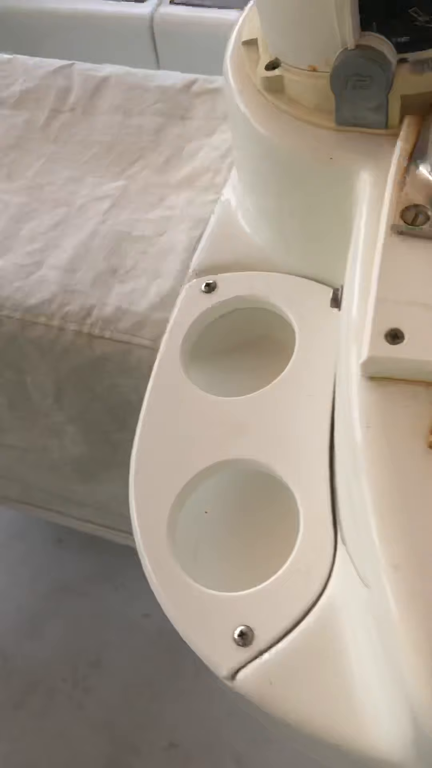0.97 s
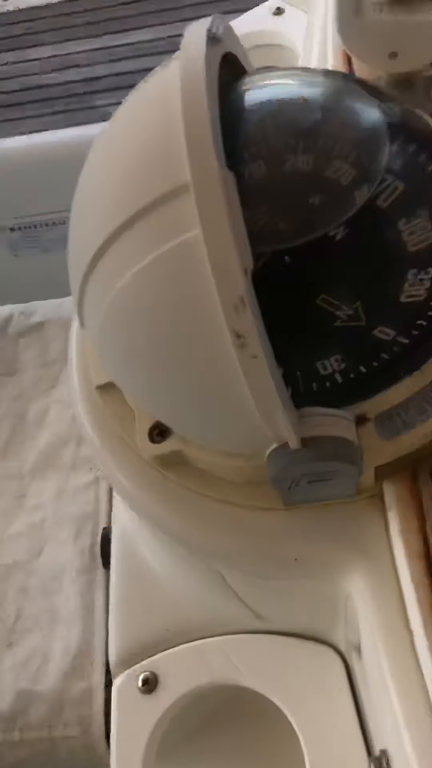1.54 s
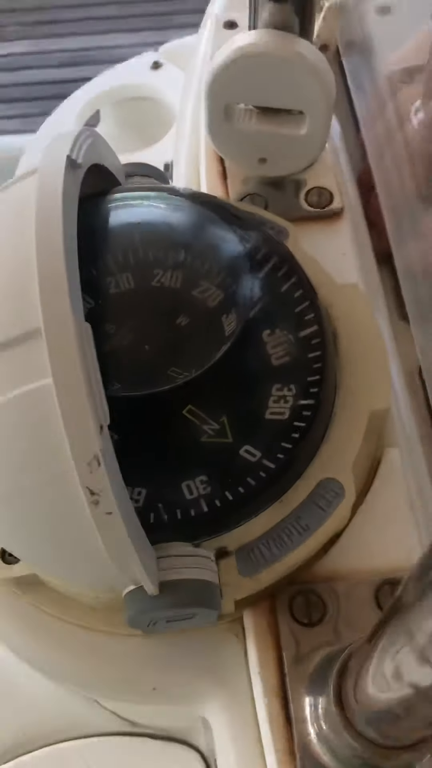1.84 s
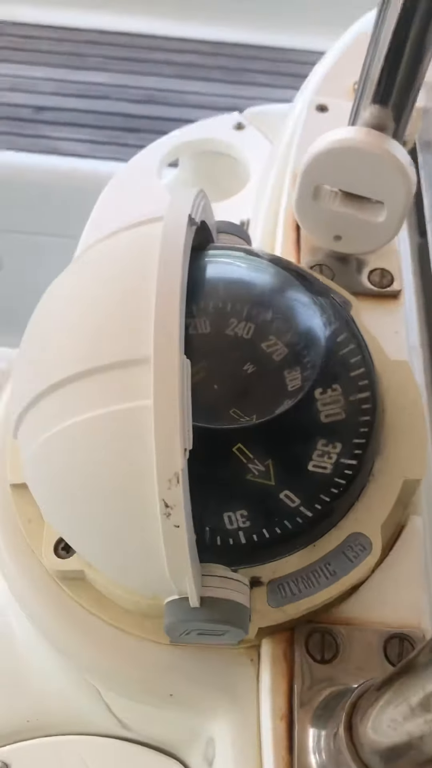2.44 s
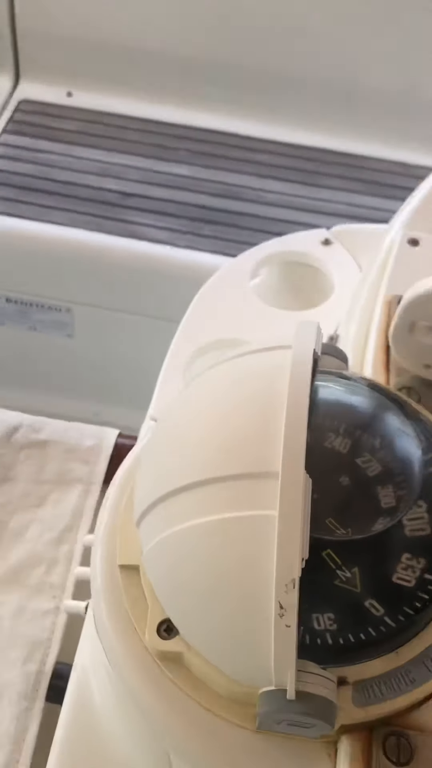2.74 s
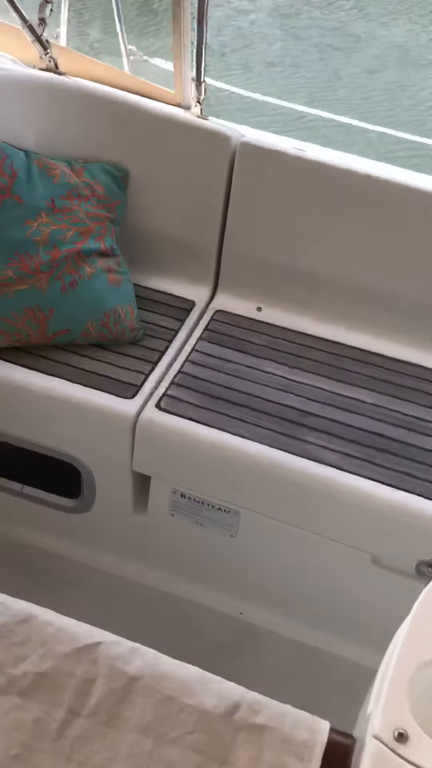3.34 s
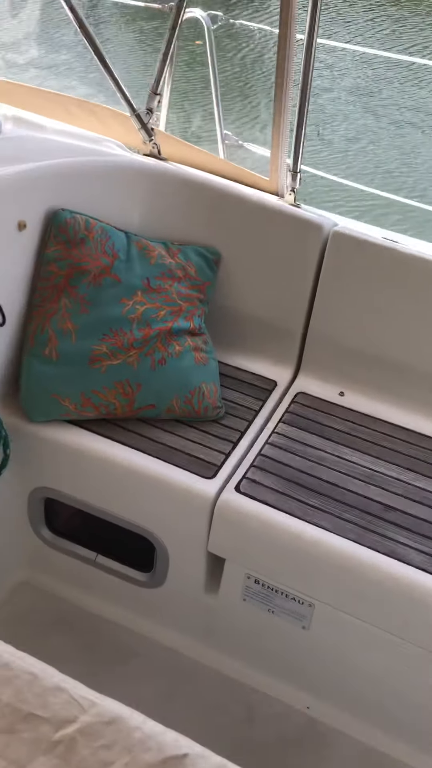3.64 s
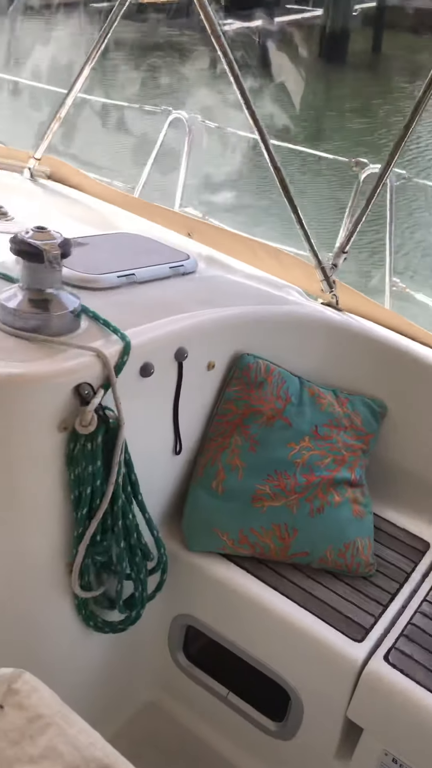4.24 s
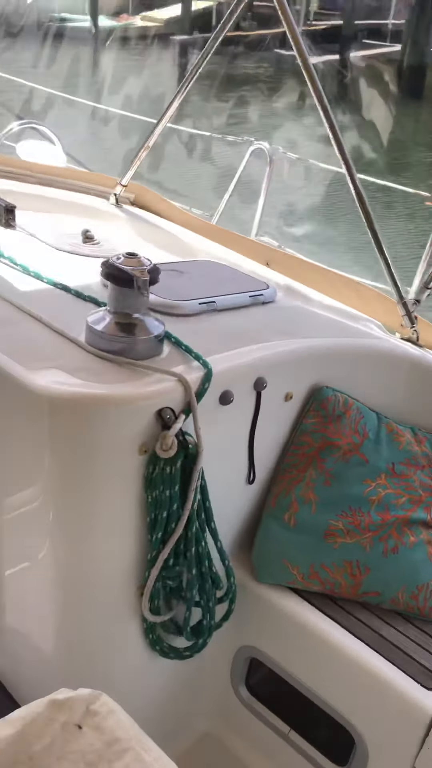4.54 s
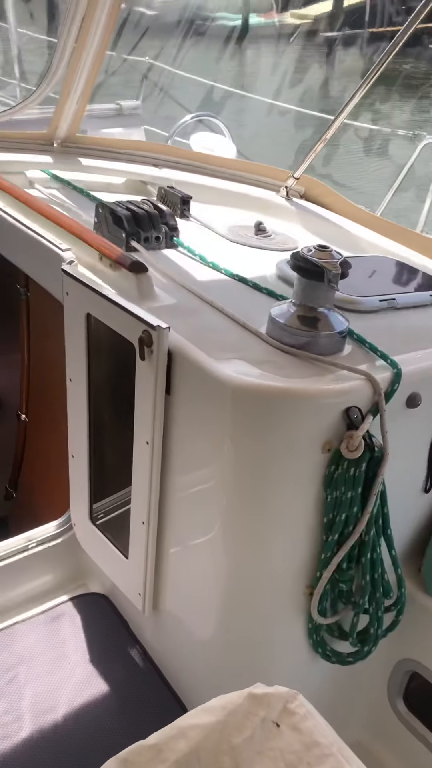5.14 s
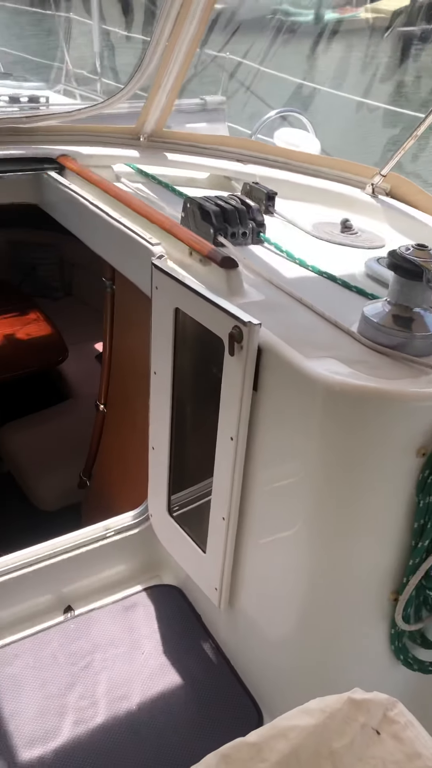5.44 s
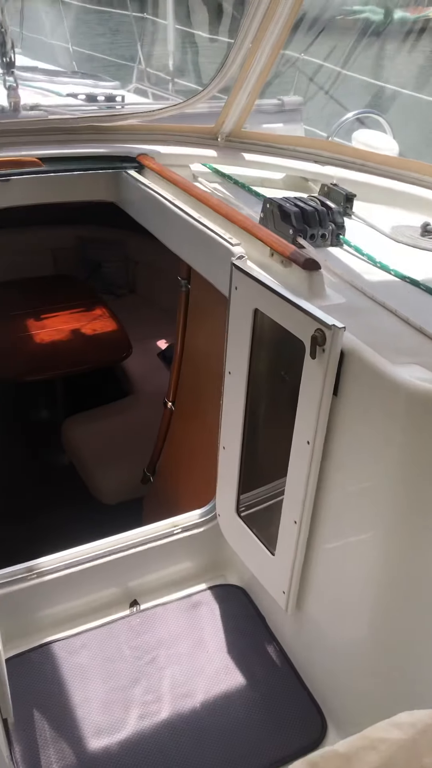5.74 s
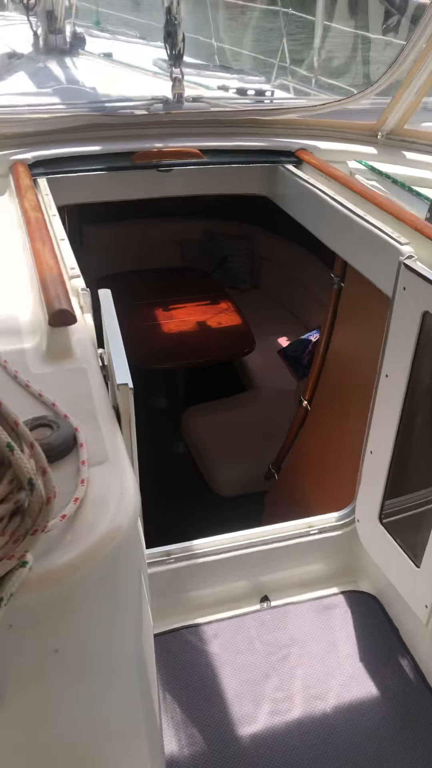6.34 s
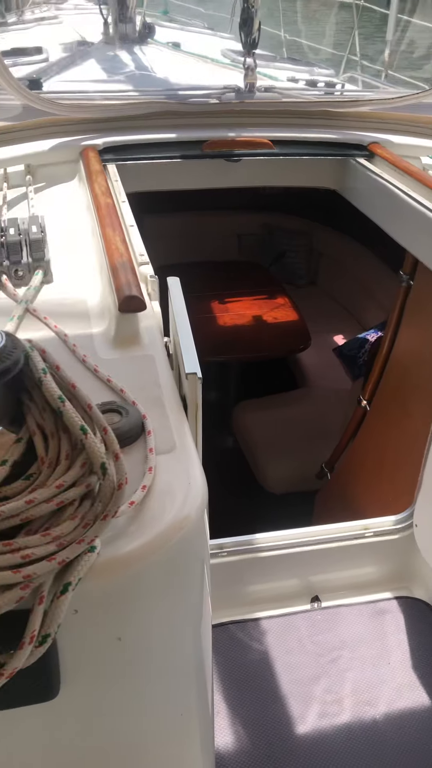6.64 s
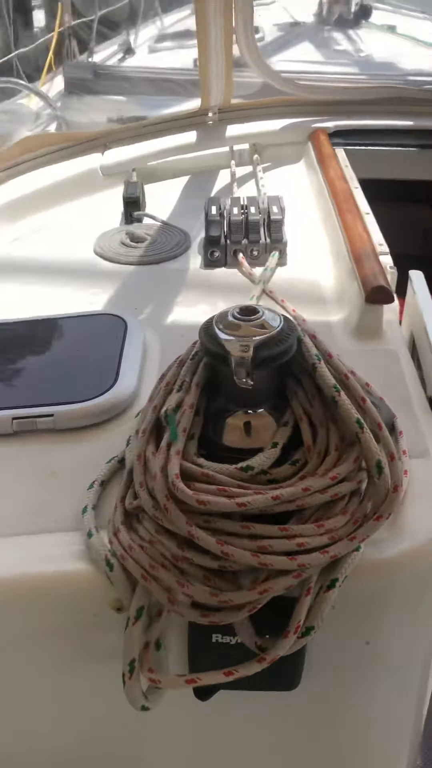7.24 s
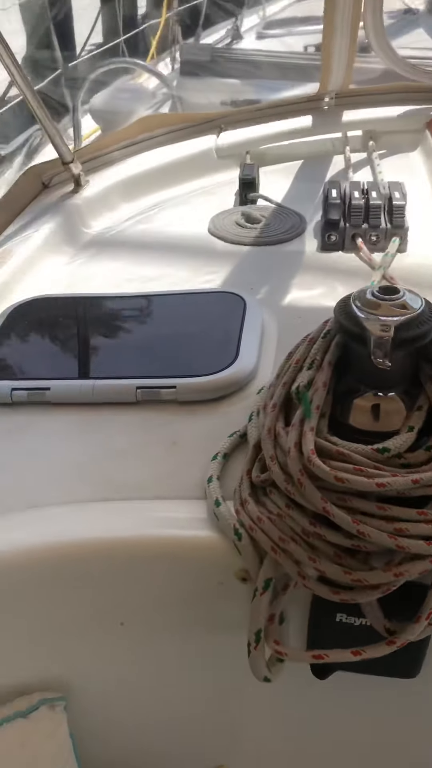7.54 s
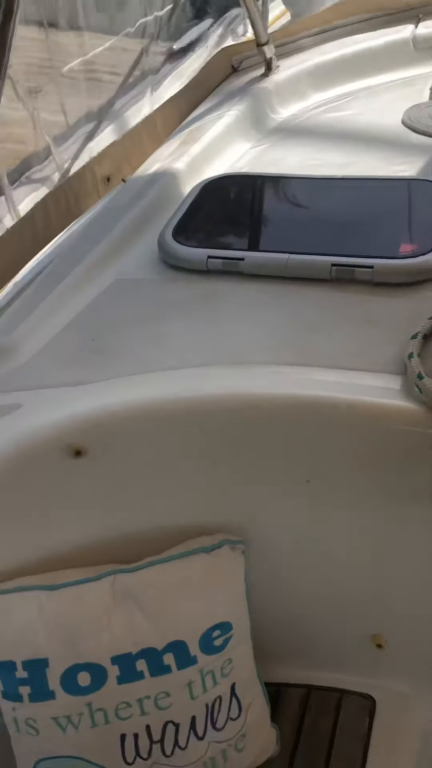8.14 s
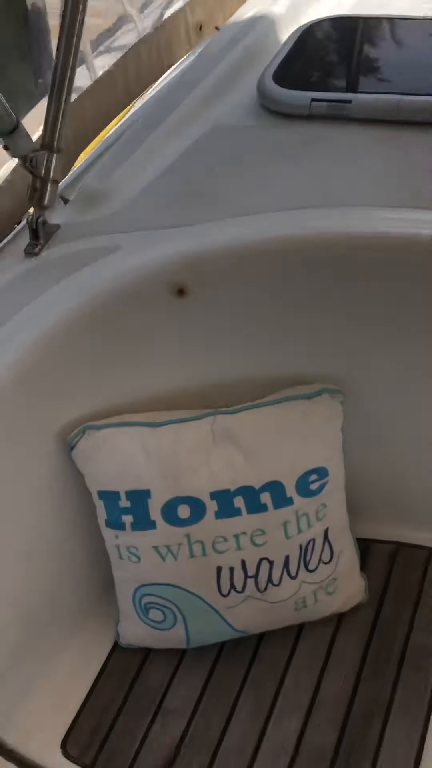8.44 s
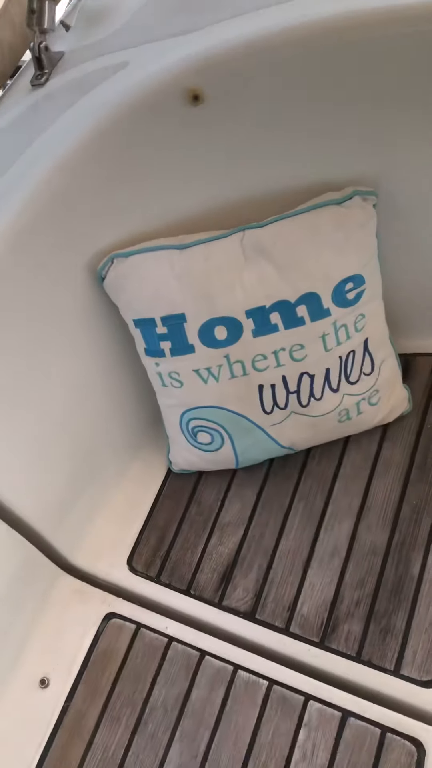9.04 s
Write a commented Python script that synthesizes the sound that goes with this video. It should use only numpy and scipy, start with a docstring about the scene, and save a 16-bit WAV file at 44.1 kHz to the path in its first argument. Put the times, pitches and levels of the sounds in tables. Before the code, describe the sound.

A dry, close rap on a lid opens at 0.1 seconds. A fitting gives a small squeaky scrape near 0.9 seconds, and light plastic taps, clicks and a step follow from 1.2 to 1.8. After a soft shoe scuff and sleeve swish, hollow fibreglass panels knock in a quick, uneven cluster from 2.7 to 3.2 seconds, ending with a bright click. Footsteps thump irregularly on the boat's floor from about 3.7 to 5.1, with a couple of knocks and low hull thuds. A thin, faint hiss swells far off around 5.6. At 6.4 seconds a hatch bangs shut, the loudest sound, making the hull boom, followed by a step and scuffs. Small metal clicks and faint taps are scattered from 7.7 to 9.1. The blows echo very briefly in the cockpit, while clothes rustle softly over a quiet harbour rumble throughout.

```python
"""First comes a dry rap on a lid, as someone moves about the fibreglass cockpit of a moored sailing boat.
Hollow panels knock, feet thump on the floor, fittings tap, squeak and click, and a hatch bangs shut.
Each blow is a burst of tiny contacts that makes a part ring and echoes between the cockpit walls;
heavy ones also make the hull boom. Clothes and shoes rub over a quiet harbour rumble and a far hiss."""
import sys
import numpy as np
from scipy import signal
from scipy.fft import rfft, irfft
from scipy.io import wavfile
from scipy.ndimage import uniform_filter1d

SR = 44100
rng = np.random.default_rng(int(sys.argv[2]) if len(sys.argv) > 2 else 0)


def bounce(signal):
    """Save signal as a 16-bit WAV file at the path given by the first command-line argument."""
    frames = np.transpose(np.atleast_2d(signal))
    limited = np.clip(frames, -1, 1)
    pcm = np.round(limited * 32767).astype(np.int16)
    wavfile.write(sys.argv[1], SR, pcm)


N = 410130
SIZE = 32768  # samples in one blow
LARGE_CROWD_HZ, SMALL_CROWD_HZ = 4000, 14000  # ringing tones of large and small parts merge above this

# Knocks on panels: t/s, level/dB, firmness/dB, contact/ms, pitch of the spot/Hz, echo/dB
KNOCKS = [(1.788, -30, 3, 7.9, 270, -7), (2.7175, -25.5, 3, 6, 410, -11.5),
          (2.786, -23.5, 3.5, 1.4, 474, -7.5), (2.8877, -20, -4.5, 0.9, 2500, -18),
          (2.8895, -21.5, -7, 2.6, 520, -4.5), (2.9262, -29, -12, 0.61, 980, -6),
          (3.1387, -18.5, -1.5, 2.8, 1130, -6), (3.176, -28.5, -6, 1.7, 1500, -4),
          (3.2135, -21, -4.5, 10, 2190, -8), (3.9808, -33.5, -11, 1.8, 1090, -3),
          (4.7152, -29.5, -3, 3.2, 2000, -4.5)]
# A panel's colour, or how strong it is from low to high: f/Hz, level/dB
PANEL_COLOUR = [(40, -35.5), (130, 2.5), (280, -1.5), (500, -5.5), (1000, -10), (1700, -5.5), (2400, -10),
                (4000, -12), (8000, -27), (15000, -50)]
# Its modes, the tones it rings at: f/Hz, width/Hz, boost/dB
PANEL_MODES = [(497, 110, 8.5), (945, 96, 9.5), (1610, 38, 3.1), (2220, 81, 5.8)]

def knocks():
    """Hollow fibreglass panels ring, each struck at a spot of its own."""
    return strike(blows(KNOCKS, bass_db=-3.5, thump=0.66), PANEL_COLOUR, PANEL_MODES,
                  spot_db=5.5, spot_q=1.64, bass_hz=328, treble_hz=3580)


# The hatch landing: t/s, level/dB, firmness/dB, contact/ms, f/Hz, echo/dB
HATCH_BLOWS = [(6.4295, -16.5, -11, 4.7, 1240, -7), (6.4425, -13, -8.5, 6, 4100, -0.5),
               (6.461, -28, -12.5, 4.3, 630, -10.5)]
# Its colour: f/Hz, level/dB
HATCH_COLOUR = [(30, -26), (70, 4.5), (200, 0), (500, -12), (1100, -14), (3800, -14.5), (6000, -4),
                (7200, -11.5), (8800, -9), (15000, -23.5)]
# Its ringing tones: f/Hz, width/Hz, boost/dB
HATCH_MODES = [(414, 13, 11.2), (1010, 25, 7.3), (5780, 20, 6), (6340, 20, 7), (8230, 25, 6)]

def hatch_bang():
    """A heavy hatch clatters shut in three quick blows."""
    return strike(blows(HATCH_BLOWS, bass_db=3.0, thump=1.3), HATCH_COLOUR, HATCH_MODES,
                  spot_db=4.0, spot_q=4.7, bass_hz=302, treble_hz=3060, ring_db=-3.5)


# A rap on a lid: t/s, level/dB, firmness/dB, contact/ms, f/Hz, echo/dB
RAP = [(.129, -18, 3.5, 2.24, 980, -15)]
# The lid's colour: f/Hz, level/dB
LID_COLOUR = [(50, -26.5), (300, -10), (1000, 1), (2200, -9), (2900, -22.5), (5500, -21), (10000, -29.5),
              (15000, -35.5)]
# Its ringing tones: f/Hz, width/Hz, boost/dB
LID_MODES = [(398, 37, 11), (1620, 88, 6.9)]

def lid_rap():
    """One blow on a lid close by, with little echo."""
    return strike(blows(RAP, bass_db=5.5, thump=0.4), LID_COLOUR, LID_MODES,
                  spot_db=3.0, spot_q=5.9, bass_hz=330, treble_hz=3000)


# Feet landing: t/s, level/dB, firmness/dB, f/Hz
STEPS = [(.463, -48.5, -3, 450), (1.67, -34, 3.5, 408), (3.257, -35, -21, 340), (3.6692, -27, 8.5, 300),
         (3.701, -30.5, 0, 307), (3.804, -27, 6, 427), (4.012, -36, -8, 556), (4.52, -39.5, -14, 427),
         (4.608, -28.5, -11, 430), (4.731, -32, -8, 480), (4.855, -30.5, 3, 375), (5.009, -28, -2.5, 367),
         (5.059, -26, -1.5, 330), (5.072, -31, -22, 280), (6.296, -40.5, 15, 278), (6.556, -25.5, 6, 240)]
# The floor's colour: f/Hz, level/dB
FLOOR_COLOUR = [(40, -8), (130, 0.5), (300, -1), (550, -5.5), (1000, -5), (2000, -13), (4000, -17),
                (8000, -25.5), (15000, -39)]
# Its ringing tones: f/Hz, width/Hz, boost/dB
FLOOR_MODES = [(220, 15, 6.7), (329.5, 18, 6.7), (399, 18, 6.5), (519.7, 16, 10.1)]

def steps(contact_ms=13.5, echo_db=-10):
    """Feet give the floor soft, slow blows."""
    rows = [(s, db, firm_db, contact_ms, hz, echo_db) for s, db, firm_db, hz in STEPS]
    return strike(blows(rows, bass_db=-1, thump=0.54), FLOOR_COLOUR, FLOOR_MODES,
                  spot_db=7.5, spot_q=3.2, bass_hz=170, treble_hz=3020)


# Light taps: t/s, level/dB, firmness/dB, f/Hz
TAPS = [(0.321, -50, -7, 1450), (0.794, -52, -8, 2800), (1.2323, -31, -3, 930), (1.2413, -26, 0.5, 950),
        (1.4135, -38, -3.5, 1510), (1.506, -36, -21, 1080), (1.606, -45.5, -22, 890),
        (1.912, -49.5, -2.5, 1650), (2.307, -39.5, -30, 1170), (2.447, -37, -20, 1040),
        (6.11, -44, -8, 744), (7.754, -44.5, -5, 835), (8.253, -46, 2, 1320), (8.984, -46, -8.5, 1710)]
# A fitting's colour: f/Hz, level/dB
FITTING_COLOUR = [(60, -23), (200, -9), (500, -3), (1100, -8), (1900, -8.5), (4000, -3.5), (8000, -10),
                  (15000, -12)]
# Its ringing tone: f/Hz, width/Hz, boost/dB
FITTING_MODES = [(1073, 160, 8.7)]

def taps(echo_db=-10):
    """Plastic fittings are tapped or brushed: a crisp tick, then the hollow body rings on."""
    rows = [(s, db, firm_db, touch_ms(db), hz, echo_db) for s, db, firm_db, hz in TAPS]
    return strike(blows(rows, bass_db=0.5, thump=0.12), FITTING_COLOUR, FITTING_MODES, spot_db=14.5,
                  spot_q=2.0, bass_hz=605, treble_hz=2400, crowd_hz=SMALL_CROWD_HZ, ring_db=6.0)


# Bright clicks: t/s, level/dB, firmness/dB, contact/ms, f/Hz, echo/dB
CLICKS = [(1.4948, -33.5, -5, 1.4, 3700, -6), (1.7831, -23.5, 1.5, 0.4, 2600, -8),
          (2.224, -43, -4, 9.3, 6500, -15), (3.3393, -27, 7, 1, 9000, -3), (7.673, -38.5, 2, 5, 9700, 0.5),
          (7.914, -35.5, 0.5, 2.7, 8340, -2), (8.133, -36, 7.5, 3.4, 5900, -4.5),
          (8.292, -44, -0.5, 16, 6750, -12), (9.089, -51.5, 0, 10, 4960, -6)]
# A catch's colour: f/Hz, level/dB
CATCH_COLOUR = [(200, -5), (1000, -9), (3500, -8), (12000, -11.5), (16000, -21)]
# Its ringing tone: f/Hz, width/Hz, boost/dB
CATCH_MODES = [(9840, 650, 1.7)]

def clicks():
    """Catches and small metal parts snap, each at its own pitch."""
    return strike(blows(CLICKS, bass_db=2.0, thump=0.13), CATCH_COLOUR, CATCH_MODES,
                  spot_db=8.5, spot_q=2.8, bass_hz=600, treble_hz=3650, crowd_hz=SMALL_CROWD_HZ)


# Slips of a fitting: t/s, level/dB, length/ms
SLIPS = [(0.872, -43, 16), (0.889, -39.5, 10), (0.9254, -34.5, 4.8)]
# A slip's colour: f/Hz, level/dB
SLIP_COLOUR = [(700, -12), (1150, -9), (2500, -1.5), (4500, -4), (12000, -16)]
# Its ringing tone: f/Hz, width/Hz, boost/dB
SLIP_MODES = [(1144, 100, 14.3)]

def squeaks(pitch_hz=1217, echo_db=-10):
    """A fitting slips three times, each shorter and stronger, so a scrape tightens into a tap."""
    rows = [(s, db, 0, ms, pitch_hz, echo_db) for s, db, ms in SLIPS]
    return strike(blows(rows, bass_db=-1, thump=0), SLIP_COLOUR, SLIP_MODES,
                  spot_db=10.0, spot_q=8.6, bass_hz=398, treble_hz=2200)


def touch_ms(db, ordinary_ms=1.7, ordinary_db=-29.5, doubling_db=11.5, longest_ms=7):
    """The weaker a touch, the longer it lasts."""
    return min(ordinary_ms * 2 ** ((ordinary_db - db) / doubling_db), longest_ms)


def blows(rows, bass_db, thump):
    """A firm blow cracks and thumps: firmness adds treble, and firmness times thump adds bass."""
    return [(s, db, bass_db + thump * firm_db, firm_db, ms, hz, echo_db)
            for s, db, firm_db, ms, hz, echo_db in rows]


def strike(rows, colour, modes, spot_db, spot_q, bass_hz, treble_hz,
           crowd_hz=LARGE_CROWD_HZ, ring_db=0.0, grit=0.32, flight_s=0.0056):
    """Each blow is a burst of tiny contacts that makes a part ring and echoes round the cockpit."""
    t, hz = np.arange(SIZE) / SR, np.fft.rfftfreq(SIZE, 1 / SR)
    body_db = over_hz(colour, hz) + sum(resonance(hz, *mode) for mode in modes)
    bass = 1 / (1 + (hz / bass_hz) ** 4)
    treble = 1 - 1 / (1 + (hz / treble_hz) ** 4)
    ringing = undb(ring_db / (1 + (hz / 1400) ** 4))  # hollow parts ring on below 1400 Hz
    out, onset = np.zeros(N), int(.025 * SR)  # a blow's level is that of its first 25 ms
    for s, db, bass_db, treble_db, contact_ms, spot_hz, echo_db in rows:
        contact_s = contact_ms / 1000
        contacts = rng.standard_normal(SIZE) * np.exp(grit * rng.standard_normal(SIZE))
        force = contacts * np.sqrt(t) * np.exp(-np.minimum(t / contact_s, 50))
        force = causal(force, 1 / broad_gain(force))  # even out lows and highs
        # echoes build up for as long as the contact lasts
        echo = undb(echo_db) * cockpit_echo(flight_s + contact_s, ringing)
        force = force / np.linalg.norm(force) + echo
        # each spot favours its own pitch, more narrowly the higher spot_q is
        spot = resonance(hz, spot_hz, spot_hz / spot_q, spot_db)
        tone_db = body_db + spot + bass_db * bass + treble_db * treble + ripple(hz, crowd_hz)
        sound = causal(force, undb(tone_db) / broad_gain(force))
        add(out, s, sound * undb(db) / rms(sound[:onset]))
    return out


def ripple(hz, crowd_hz, size_db=4.5, count=170):
    """Where a blow lands decides which tones are strong or weak (dB); above crowd_hz they even out."""
    sparse = hz / (hz + 250) / np.hypot(1, hz / crowd_hz)
    strengths = rng.uniform(-0.92, 1, count) * np.sqrt(3)
    return size_db * sparse * np.interp(np.sqrt(hz / hz[-1]), np.linspace(0, 1, count), strengths)


# How long the cockpit echoes: f/Hz, time to fade by 60 dB/s
ECHO_FADES = [(100, 0.29), (500, 0.24), (5000, 0.22), (14000, 0.13)]

def cockpit_echo(build_s, colour):
    """Sound bounces between seats, floor and canopy; the treble dies first."""
    t, hz = np.arange(SIZE) / SR, np.fft.rfftfreq(SIZE, 1 / SR)
    spectrum, tail = colour * rfft(rng.standard_normal(SIZE)), 0
    centres, fades = np.transpose(ECHO_FADES)
    for share, fade_s in zip(np.eye(len(centres)), fades):
        band = irfft(spectrum * np.interp(np.log(hz + 1), np.log(centres), share))
        tail = tail + band * np.exp(-np.log(1000) * t / fade_s)
    tail = tail * (1 - np.exp(-(t / build_s) ** 2))
    return tail / np.linalg.norm(tail)


# Heavy pushes on the hull: t/s, strength/dB
BOOMS = [(0.127, -42), (3.83, -33), (4.016, -29.5), (6.444, -19.5), (6.588, -36)]
# The hull's deep tones: f/Hz, gain/dB, time to fade by 60 dB/s
HULL_MODES = [(59, -5.5, 0.26), (133, 12.5, 0.14), (106.4, 4, 0.024)]

def hull_booms(push_s=0.0078):
    """Weight comes down slowly and sets off the hull's lowest tones."""
    t, out = np.arange(SIZE) / SR, np.zeros(N)
    ring = sum(undb(db) * np.sin(2 * np.pi * hz * t) * np.exp(-np.log(1000) * t / fade_s)
               for hz, db, fade_s in HULL_MODES)
    for s, db in BOOMS:
        add(out, s, undb(db) * ring * (1 - np.exp(-(t / push_s) ** 2)))
    return out


# How much the clothes stir as the body moves: t/s, level/dB
STIR = [(0, -68.5), (1.09, -67.5), (1.68, -58), (1.96, -73), (2.2, -71), (2.39, -56), (2.76, -52),
        (3.55, -60), (3.99, -66), (4.41, -58), (5.2, -66.5), (5.72, -67.5), (6.02, -53.5), (6.55, -51),
        (6.93, -59), (7.14, -52.5), (7.48, -66.5), (7.87, -56.5), (8.46, -68.5), (8.74, -55), (9.0, -64),
        (9.3, -65)]
# Sleeve swishes: peak t/s, half length/s, level/dB
SWISHES = [(0.634, 0.029, -52.5), (2.555, 0.033, -40.5), (4.507, 0.027, -46.5), (5.974, 0.064, -47),
           (6.473, 0.081, -34.5), (8.851, 0.02, -45)]
# Shoes sliding on the floor: peak t/s, half length/s, level/dB
SCUFFS = [(2.373, 0.1, -40.5), (3.807, 0.033, -33.5), (4.643, 0.019, -39.5), (5.39, 0.033, -50),
          (6.574, 0.015, -26), (6.64, 0.029, -38.5), (6.82, 0.019, -43.5), (7.776, 0.054, -45.5)]
# Colour of dull rubbing: f/Hz, level/dB
RUB_COLOUR = [(100, -3), (300, 3.5), (900, 3.5), (1700, 1), (3500, -6.5), (8000, -36.5)]
# Colour of crackling fibres: f/Hz, level/dB
FIBRE_COLOUR = [(2000, -3), (4500, 0.5), (8000, -4), (12000, -6.5), (16000, -15.5)]

def clothes_and_shoes(uneven_db=1.5, landing_half_s=0.0043, landing_db=-11.5):
    """Cloth and shoes drag and catch unevenly: a dull rubbing and the fine crackle of fibres."""
    stir = undb(over_time(STIR) + uneven_db * wander(18)) ** 2
    sleeves = sum(swell(*swish) for swish in SWISHES)
    shoes = sum(swell(*scuff) for scuff in SCUFFS)
    shoes += sum(swell(s, landing_half_s, db + landing_db) for s, db, *_ in STEPS)  # each step scuffs
    # shoes mostly rub, sleeves mostly hiss
    rub_power = shoes + stir * undb(3) ** 2 + sleeves * undb(-4) ** 2
    hiss_power = sleeves + stir * undb(2) ** 2 + shoes * undb(-11) ** 2
    dragging, catching, fibres = wander(70), wander(45), wander(900)
    dull = noise(RUB_COLOUR) * np.sqrt(rub_power) * undb(uneven_db * dragging)
    fine = noise(FIBRE_COLOUR) * np.sqrt(hiss_power) * undb(uneven_db * (fibres + catching / 2))
    return dull + fine


# Colour of the harbour rumble: f/Hz, level/dB
HARBOUR_COLOUR = [(20, -43), (35, -18.5), (55, 1), (110, -4.5), (200, -6.5), (350, -16.5), (2000, -42),
                  (15000, -71)]

def harbour(level_db=-51, fade_db=-2):
    """A low distant rumble flutters a little and slowly fades."""
    flutter = undb(1.2 * wander(14))
    return noise(HARBOUR_COLOUR) * flutter * undb(level_db + fade_db * np.linspace(0, 1, N))


# Rise and fall of a far hiss: t/s, level/dB
FAR_HISS = [(3.8, -82.5), (5.65, -60.5), (6.0, -79)]

def far_hiss(centre_hz=4350, width_hz=600, waver_db=-2.0):
    """A thin, narrow hiss far off comes and goes."""
    hz = np.fft.rfftfreq(N, 1 / SR)
    hiss = irfft(rfft(rng.standard_normal(N)) / (1 + ((hz - centre_hz) / width_hz) ** 2), N)
    return hiss / rms(hiss) * undb(over_time(FAR_HISS) + waver_db * wander(12))


def undb(db):
    """Turn decibels into a gain."""
    return 10 ** (np.asarray(db) / 20)


def rms(x):
    """A signal's average size (root mean square)."""
    return np.sqrt(np.mean(x ** 2))


def over_hz(points, hz):
    """Join (Hz, value) points, giving each octave equal room."""
    at, value = np.transpose(points)
    return np.interp(np.log(hz + 1), np.log(at), value)


def over_time(points):
    """Join (s, value) points with straight lines."""
    return np.interp(np.arange(N) / SR, *np.transpose(points))


def resonance(hz, centre, width, db):
    """The bump, in dB, that one ringing tone adds to a colour."""
    return 10 * np.log10(1 + (undb(db) ** 2 - 1) / (1 + (2 * (hz - centre) / width) ** 2))


def causal(x, gain):
    """Filter so that tones ring after the blow, never before (minimum phase)."""
    cepstrum = irfft(np.log(gain + 1e-9))
    cepstrum[1:SIZE // 2] *= 2
    cepstrum[SIZE // 2 + 1:] = 0
    return irfft(rfft(x) * np.exp(rfft(cepstrum)))


def broad_gain(x):
    """Strength at each frequency, smoothed over about a third of an octave."""
    total = np.cumsum(np.abs(rfft(x)) ** 2)
    k = np.arange(len(total))
    lo, hi = np.maximum(k - k // 9 - 20, 0), np.minimum(k + k // 9 + 20, k[-1])
    return np.sqrt((total[hi] - total[lo]) / (hi - lo))


def noise(colour):
    """Noise of a given colour, with average size 1."""
    gain = undb(over_hz(colour, np.fft.rfftfreq(N, 1 / SR)))
    x = irfft(rfft(rng.standard_normal(N)) * gain, N)
    return x / rms(x)


def wander(rate):
    """A smooth drift of average size 1 through rate random values a second."""
    k = max(int(SR / rate), 1)
    held = np.repeat(rng.standard_normal(N // k + 1), k)
    x = uniform_filter1d(uniform_filter1d(held, k), k)[:N]
    return x / rms(x)


def swell(s, half_s, db):
    """Power of a slide that rises and falls around time s."""
    return undb(db) ** 2 * np.exp(-np.minimum(((np.arange(N) / SR - s) / half_s) ** 2, 50))


def add(out, s, sound):
    """Mix a sound in at time s."""
    start = int(s * SR)
    out[start:start + len(sound)] += sound[:N - start]


def scene():
    """All the blows and the background, in one channel."""
    struck = lid_rap() + knocks() + steps() + taps() + clicks() + squeaks() + hatch_bang()
    return (struck + hull_booms() + clothes_and_shoes() + harbour() + far_hiss())[None]


def record(dry):
    """A hand-held phone rounds the highest peaks and cuts the treble above 15900 Hz."""
    rounded = 1.1 * np.tanh(dry / 1.1)
    return signal.sosfilt(signal.ellip(10, .2, 80, 15900, fs=SR, output="sos"), rounded)


dry = scene()
out = record(dry)
bounce(out)
```